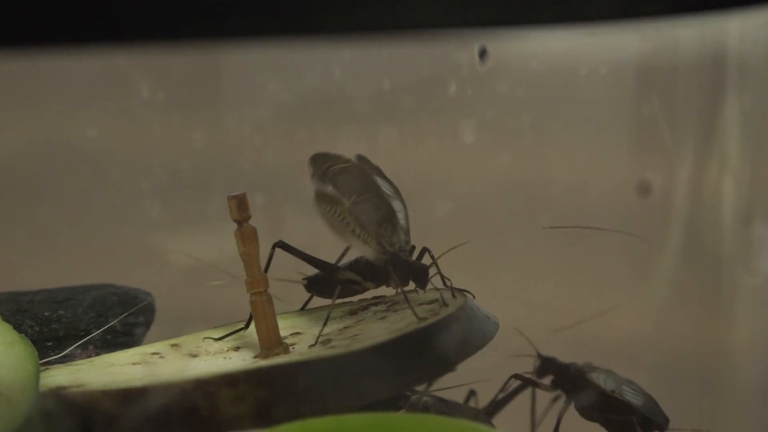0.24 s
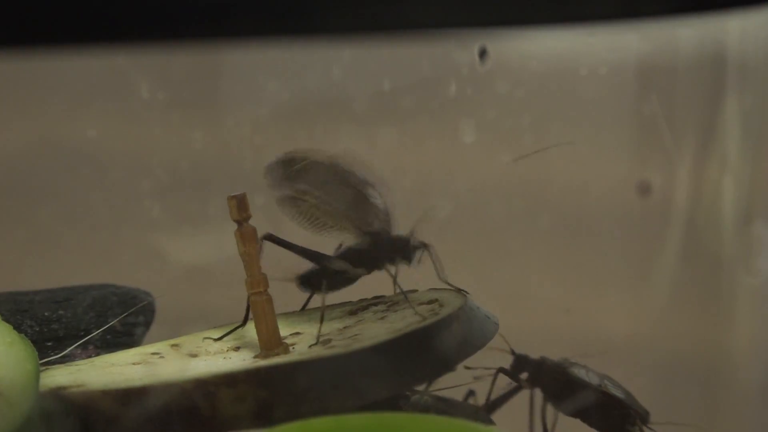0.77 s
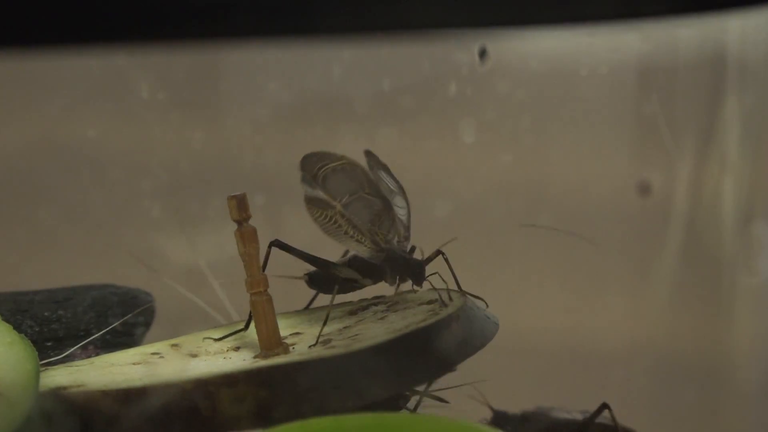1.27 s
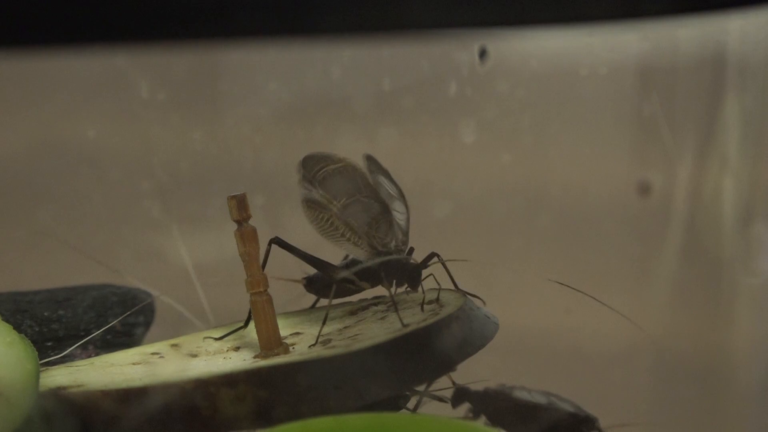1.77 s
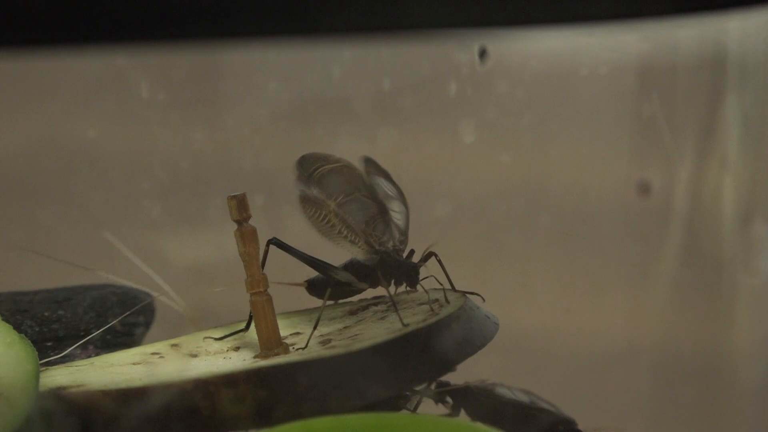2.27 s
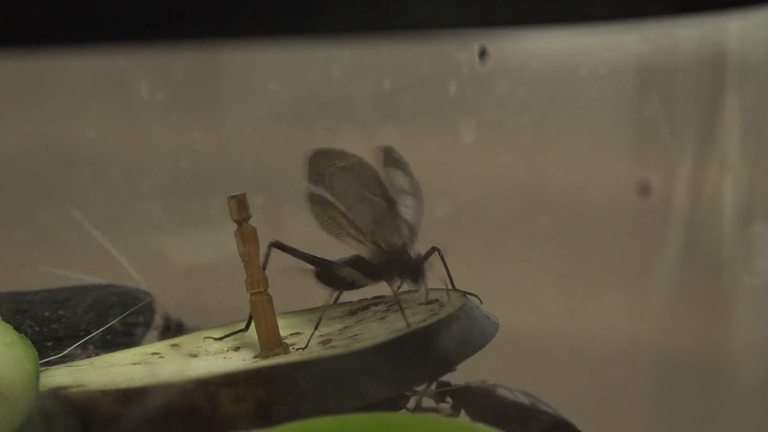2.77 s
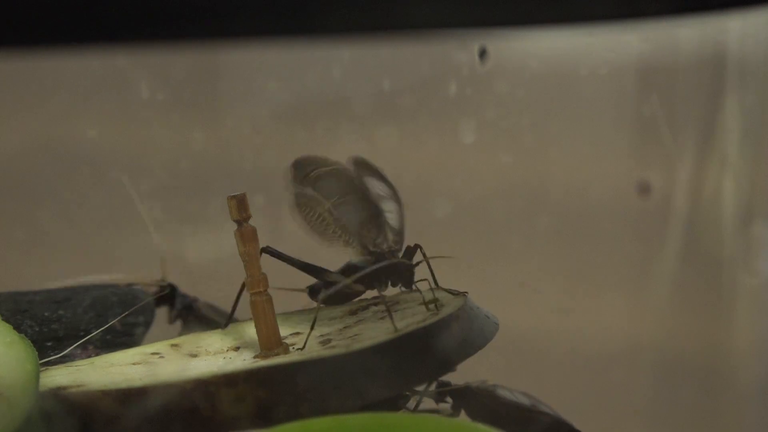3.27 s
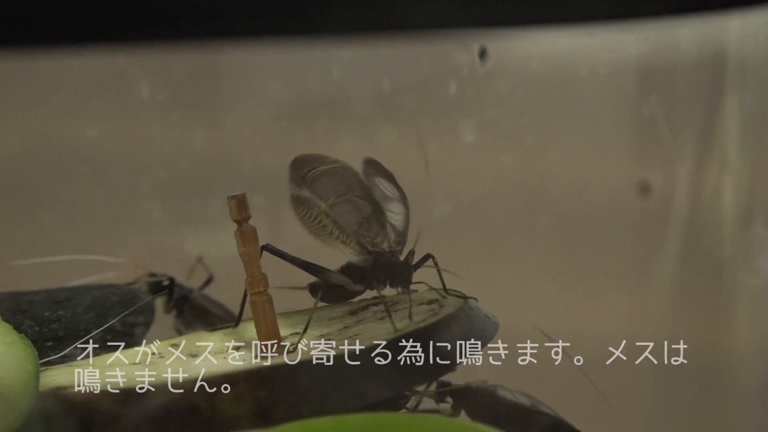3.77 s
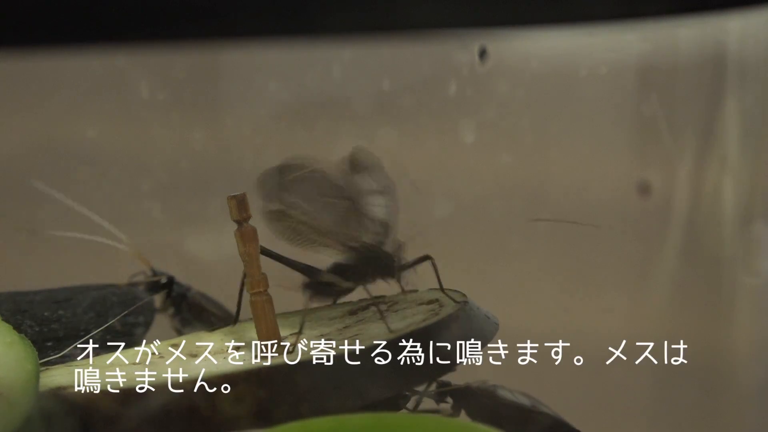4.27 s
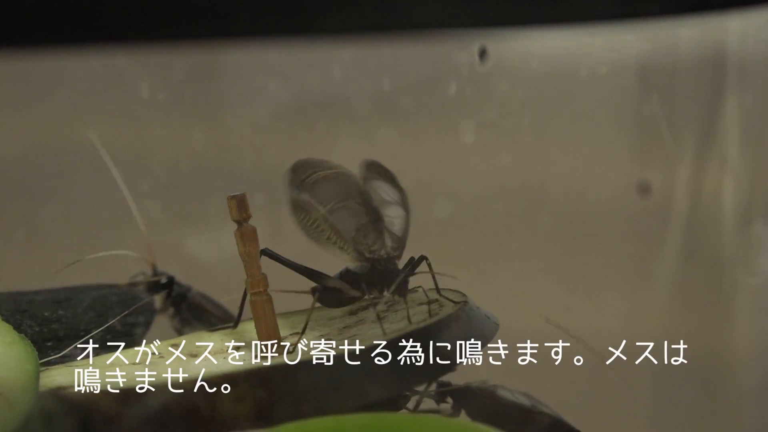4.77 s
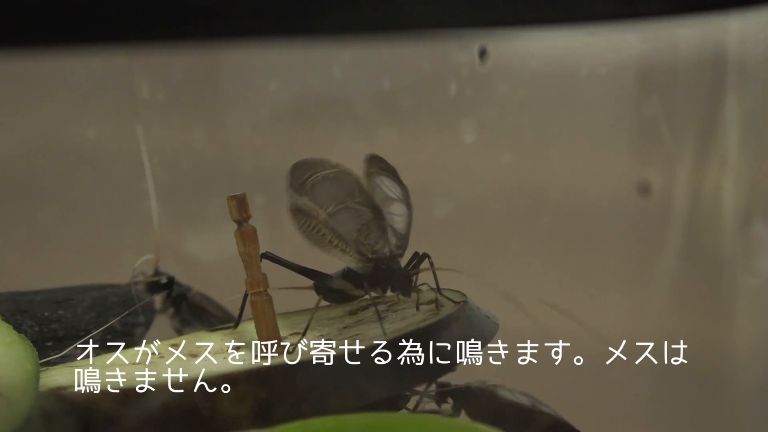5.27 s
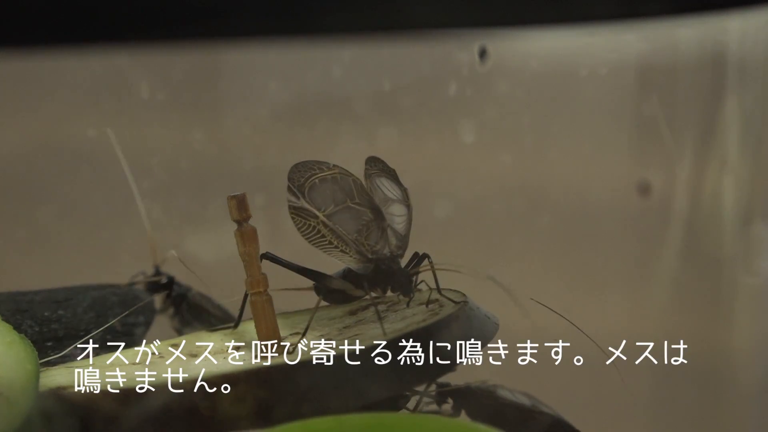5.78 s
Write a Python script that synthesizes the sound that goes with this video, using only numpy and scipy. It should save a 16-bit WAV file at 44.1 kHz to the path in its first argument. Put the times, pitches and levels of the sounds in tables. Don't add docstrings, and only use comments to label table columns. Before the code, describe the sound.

A faint high cricket trill is joined almost at once by a loud ringing phrase from a near male. Two other males trill without pause behind while near ones call in bursts, loudest around four seconds. Raspy wing scraping and tiny ticks colour the song. All stop just before six seconds, leaving soft room hiss. Small tank indoors, close stereo microphone.

```python
import sys
import numpy as np
from scipy import signal
from scipy.fft import rfft, irfft, next_fast_len
from scipy.io import wavfile
from scipy.ndimage import uniform_filter1d, minimum_filter1d

SR = 44100
rng = np.random.default_rng(int(sys.argv[2]) if len(sys.argv) > 2 else 0)


def level_to_linear(level):
    exponent = np.asarray(level, float) / 20
    return 10 ** exponent


def wav_out(sig):
    wavfile.write(sys.argv[1], SR, np.round(np.clip(np.atleast_2d(sig).T, -1, 1) * 32767).astype(np.int16))


N = 266055
T, FFT_LEN = np.arange(N) / SR, next_fast_len(N)

# (long opening stroke [s], stroke rate [1/s], pitch [Hz], male index)
PHRASES = [
    (.212, 45.2, 4640, 0),
    (1.955, 45.2, 4642, 0),
    (2.348, 44.6, 4606, 1),
    (3.267, 43.9, 4642, 0),
    (3.854, 43.7, 4600, 1),
    (4.653, 41.7, 4642, 0),
    (5.15, 42.2, 4590, 2),
]
# (time [s], level [dB])
PHRASE_EFFORT = [
    [(.165, -27.5), (.21, -17), (.29, -26.5), (.4, -27.5), (.57, -29), (.63, -42)],
    [(1.91, -23), (1.96, -17), (1.99, -27), (2.06, -21.5), (2.25, -21), (2.46, -21)],
    [(2.33, -41), (2.36, -15), (2.39, -13), (2.47, -19.5), (2.55, -18), (2.63, -37)],
    [(3.18, -33.5), (3.27, -17), (3.32, -25.5), (3.45, -20), (3.58, -23.5), (3.79, -26)],
    [(3.79, -28), (3.82, -16), (3.85, -10.5), (3.91, -8.5), (4.0, -16), (4.1, -12), (4.17, -32.5)],
    [(4.5, -36), (4.6, -19.5), (4.68, -22), (4.9, -23.5), (5.05, -23), (5.14, -31)],
    [(5.16, -30), (5.22, -39.5), (5.4, -37), (5.6, -35), (5.7, -50)],
]
# (pitch drop [Hz/s], sag [Hz], stroke length [ms], 2nd partial [dB], 3rd partial [dB])
CALLERS = [
    (10.05, 80, 19, -36.5, -35),
    (88.1, 100, 11.83, -46.5, -41),
    (4.97, 200, 11, -30.5, -39),
]
# (pitch [Hz], stroke rate [1/s], 2nd partial [dB], 3rd partial [dB], sag [Hz])
TRILLERS = [
    (4523, 44.3, -25, -26, 260),
    (4615, 41.5, -18, -34, 120),
]
# (time [s], lower male level [dB], higher male level [dB])
TRILL_LEVEL = [(0, -43.5, -56), (.1, -42, -42), (.2, -35.5, -27), (.6, -45.5, -36), (.8, -34, -39),
               (1.3, -34, -36.5), (1.85, -35, -33.5), (2.3, -32.5, -33.5), (2.7, -30, -31.5),
               (3.15, -30, -38), (3.5, -30.5, -37), (3.8, -35.5, -29), (4.2, -26, -34), (4.45, -30, -36.5),
               (4.8, -31.5, -26.5), (5.12, -28.5, -38.5), (5.2, -44.5, -34.5), (5.7, -45, -42)]
TRILL_END_S = 5.70
# (frequency [Hz], density [dB per Hz])
RASP_SPECTRUM = [(2000, -41), (3000, -18), (3700, -8.5), (4200, 1.5), (4500, 9.5), (4800, 15), (5200, 5),
                 (5800, -4), (6900, -8.5), (8800, -1.5), (10200, -14.5), (12500, -13), (15600, -13)]
# (frequency [Hz], width [Hz], level [dB])
PANELS = [(4226, 99, 6.5), (5400, 270, -3), (6200, 88, 5.5), (6570, 150, 5), (7200, 150, -1),
          (8040, 250, -10), (11800, 350, 1), (14700, 820, 0)]
# (time [s], level over steady rasp [dB])
SCRAPES = [
    (0, -5.5),
    (0.216, 3),
    (.68, 3.5),
    (2.0, 2.5),
    (3.26, 6.5),
    (4.656, 5),
    (5.12, 0),
]
# (time [s], peak level [dB], ring [Hz])
SLIPS = [(.218, -38.5, 8300), (0.215, -49, 3000), (.228, -36.5, 14900), (2.016, -37.5, 8900),
         (3.277, -40.5, 8200), (3.305, -37.5, 8200), (4.661, -33.5, 8240), (4.66, -28.5, 5400),
         (3.276, -30.5, 5230), (5.135, -44, 4310), (5.925, -57, 5570)]
# (frequency [Hz], width [Hz], level [dB])
TANK_MODES = [(4406, 37, 1), (4580, 64, -6.5), (4603, 72, -2.5), (4670, 49, 7)]
# (frequency [Hz], density [dB per Hz])
HISS_SPECTRUM = [(15, -32), (30, -17), (60, -7), (110, -10), (240, -10.5), (400, -14.5), (900, -13),
                 (1300, -15.5), (2500, -19), (3450, -19), (4000, -21), (8000, -22), (12000, -24),
                 (15700, -23.5)]
# (frequency [Hz], level [dB rms])
HUM_LINES = [(49.5, -73.5), (100, -62), (149, -66.5), (200, -71.5), (298, -73.5), (732, -80.5), (900, -79),
             (1152, -75.5), (1550, -79), (1647, -83.5), (1750, -84.5)]
# (centre [s], width [s], level [dB])
WHIRR_SWELLS = [
    (.8, 0.33, -72),
    (1.65, .3, -67.5),
    (5.1, .7, -81.5),
]
# (frequency [Hz], side against mid [dB])
SIDE_WIDTH = [(60, -19), (200, -11), (380, -6.5), (700, -10.5), (1290, -14.5), (2400, -14), (4600, -22),
              (6000, -7), (8000, -1), (9200, -2.5), (11300, -6), (12000, -33), (15000, -45.5)]
ROOM_T60_S, TOP_T60_S = 0.31, 0.35


def callers():
    second_share, third_share = 0.46, 0.85
    tone, over, envs, gates = 0, 0, 0, 0
    for (opening_s, rate_hz, pitch_hz, male), effort in zip(PHRASES, PHRASE_EFFORT):
        drop_hz_s, sag_hz, stroke_ms, second_db, third_db = CALLERS[int(male)]
        strokes = phrase(opening_s, rate_hz, stroke_ms, effort)
        falling_hz = pitch_hz - drop_hz_s * np.clip(T - opening_s, 0, 1)
        env, gate, phase = wing(strokes, falling_hz, sag_hz, jitter_hz=11.94)
        effort_db = curve(effort)[0]
        second = level_to_linear(second_db + 3.5 + second_share * effort_db) * np.sin(2 * phase)
        third = level_to_linear(third_db + 6.0 + third_share * effort_db) * np.sin(3 * phase)
        tone = tone + env * np.sin(phase)
        over = over + gate ** 2 * (second + third)
        envs, gates = envs + env, gates + gate
    song = room(level_to_linear(-1.0) * tone + tank(tone, db=-19.5), wet_db=-7.5)
    cell_band = [(4900, -91), (5300, -43.5), (5400, -37.5), (5520, -43.5), (5900, -93.5)]
    cell = colour(np.sqrt(envs) * rng.standard_normal(N), cell_band)
    return song + room(over + cell, wet_db=-1.0, t60_s=TOP_T60_S), gates


def phrase(opening_s, rate_hz, stroke_ms, effort):
    opening_ms, opening_gap_s, peak_db = 24.96, 0.031, 3.5
    effort_s, effort_db = np.transpose(effort)
    chance = rng.standard_normal((60, 3)).T * (np.arange(60) > 0)
    steps_s = np.arange(30) / rate_hz + opening_gap_s
    times_s = opening_s + np.r_[0, steps_s, -steps_s[:-1]] + 0.0011 * chance[0]
    levels_db = np.interp(times_s, effort_s, effort_db) + peak_db + 1.1 * chance[1]
    lengths_ms = np.r_[opening_ms, stroke_ms * (1 + 0.2 * np.clip(chance[2, 1:], -2, 2))]
    strokes = np.array([times_s, levels_db, lengths_ms]).T
    return strokes[(times_s > effort_s[0]) & (times_s < effort_s[-1])]


def wing(strokes, pitch_hz, sag_hz, jitter_hz):
    env, gate, sag = np.zeros((3, N))
    for centre_s, level_db, length_ms in strokes:
        along = np.linspace(0, 1, int(length_ms * SR / 500))
        start = int(centre_s * SR - len(along) / 2)
        if start > 0:
            end = start + len(along)
            swell = np.sin(np.pi * along) ** 2
            env[start:end] += level_to_linear(level_db) * swell
            gate[start:end] += swell
            sag[start:end] += along ** 5 * np.sqrt(1 - along) * 5 + 0.11 * (along - 0.5)
    ring_hz = pitch_hz - sag_hz * sag + jitter_hz * walk(321.0)
    return env, gate, np.cumsum(2 * np.pi * ring_hz / SR)


def trillers():
    out, gates = 0, 0
    for (pitch_hz, rate_hz, second_db, third_db, sag_hz), level_db in zip(TRILLERS, curve(TRILL_LEVEL)):
        chance = rng.standard_normal((300, 3)).T
        times_s = np.cumsum(1 + 0.025 * chance[0]) / rate_hz - 0.012
        strokes = np.array([times_s, 2.16 * chance[1], 11 + 1.22 * chance[2]]).T
        strokes = strokes[times_s < TRILL_END_S]
        env, gate, phase = wing(strokes, pitch_hz + 8 * walk(18.86), sag_hz, jitter_hz=34.62)
        env = env * level_to_linear(level_db + 2)
        over = level_to_linear(second_db) * np.sin(2 * phase) + level_to_linear(third_db) * np.sin(3 * phase)
        out = out + room(tank(env * np.sin(phase), db=-3), wet_db=1.0)
        out = out + room(env * over, wet_db=-1.0, t60_s=TOP_T60_S)
        gates = gates + gate
    return out, gates


def rasp(gate):
    rasp_db, trill_share, scrape_s = -51, 0.23, 0.096
    unevenness = level_to_linear(3.9 * np.clip(walk(670), -2, 2))
    teeth = rng.standard_normal(N) * unevenness * (1.8 + gate) * (T < TRILL_END_S)
    band = unit(colour(unit(teeth), RASP_SPECTRUM, PANELS))
    flare_db = sum(db * (T > s) * np.exp(-np.abs(T - s) / scrape_s) for s, db in SCRAPES)
    level_db = rasp_db + trill_share * (curve(TRILL_LEVEL)[0] + 33) + flare_db
    return room(level_to_linear(level_db + 7) * band, wet_db=-1.5, t60_s=TOP_T60_S)


def slips():
    out, t = np.zeros(N), T[:500]
    for time_s, peak_db, ring_hz in SLIPS:
        ring = np.sin(2 * np.pi * ring_hz * t) + 0.29 * rng.standard_normal(len(t))
        start = int(time_s * SR)
        out[start:start + len(t)] += level_to_linear(peak_db) * ring * t / 0.0018 * np.exp(1 - t / 0.0016)
    return room(colour(out, [(1500, -7), (2500, 2.5), (15000, 3.5)]), wet_db=-9)


def background():
    hiss_db, whirr_db = -59, -80.5
    hiss_modes = [(3580, 60, 5.5), (4250, 23, 4)]
    hiss = np.array([unit(colour(rng.standard_normal(N), HISS_SPECTRUM, hiss_modes)) for _ in range(2)])
    hum = 0
    for line_hz, level_db in HUM_LINES:
        level = np.sqrt(2) * level_to_linear(level_db + 0.37 * walk(2.2))
        hum = hum + level * np.sin(2 * np.pi * line_hz * T + 0.3 * walk(2.5))
    whirr_band = [(600, -37.5), (720, 1.5), (820, -26), (1000, -1), (1150, -0.5), (1300, -39.5)]
    whirr = unit(colour(rng.standard_normal(N), whirr_band))
    swell = sum(level_to_linear(db) * np.exp(-((T - s) / width_s) ** 2) for s, width_s, db in WHIRR_SWELLS)
    return level_to_linear(hiss_db) * hiss + hum + (level_to_linear(whirr_db) + swell) * whirr


def tank(x, db):
    return colour(x, [(4000, db), (5000, db)], TANK_MODES)


def room(x, wet_db, t60_s=ROOM_T60_S):
    t = T[:SR // 2]
    decay = np.exp(-np.log(1000) * t / t60_s) * (1 - np.exp(-t / 0.0033))
    tails = rng.standard_normal((2, len(t))) * decay
    tails /= np.sqrt(np.sum(tails ** 2, axis=1, keepdims=True))
    lead = SR // 8
    wet = signal.fftconvolve(np.r_[x[:lead], x][None], tails, axes=1)[:, lead:lead + N]
    return np.array([x + level_to_linear(wet_db) * wet[0], 0.73 * x + 1.0 * wet[1]])


def colour(x, points, modes=(), turn_rad=0):
    hz, db = np.transpose(points)
    f = np.maximum(np.arange(FFT_LEN // 2 + 1) * SR / FFT_LEN, 1)
    ring = 1 + sum(level_to_linear(m_db) / (1 + 2j * (f - m_hz) / width_hz) for m_hz, width_hz, m_db in modes)
    gain = level_to_linear(np.interp(np.log(f), np.log(hz), db))
    return irfft(rfft(x, FFT_LEN) * gain * ring * np.exp(1j * turn_rad), FFT_LEN)[:N]


def curve(table):
    s, *columns = np.transpose(table)
    return [np.interp(T, s, c) for c in columns]


def walk(rate_hz):
    k = max(int(SR / rate_hz), 2)
    return unit(uniform_filter1d(uniform_filter1d(rng.standard_normal(N), k), k))


def unit(x):
    return x / np.sqrt(np.mean(x ** 2))


def scene():
    near, near_gate = callers()
    far, far_gate = trillers()
    mid, side = near + far + rasp(far_gate + 0.35 * near_gate) + slips() + background()
    side = colour(side, SIDE_WIDTH, turn_rad=1.55)
    return np.array([mid + side, mid - side])


def band_limit(x):
    return signal.sosfilt(signal.butter(12, 15730, fs=SR, output="sos"), x)


def record(dry):
    over_db = np.maximum(20 * np.log10(np.abs(dry).max(axis=0) + 1e-9) + 8, 0)
    held_db = -minimum_filter1d(-over_db, size=2001)
    step = 1 / (0.4 * SR)
    duck_db = signal.lfilter([step], [1, step - 1], held_db)
    return band_limit(dry * level_to_linear(-1.6 * duck_db))


dry = scene()
out = record(dry)
wav_out(out)
```